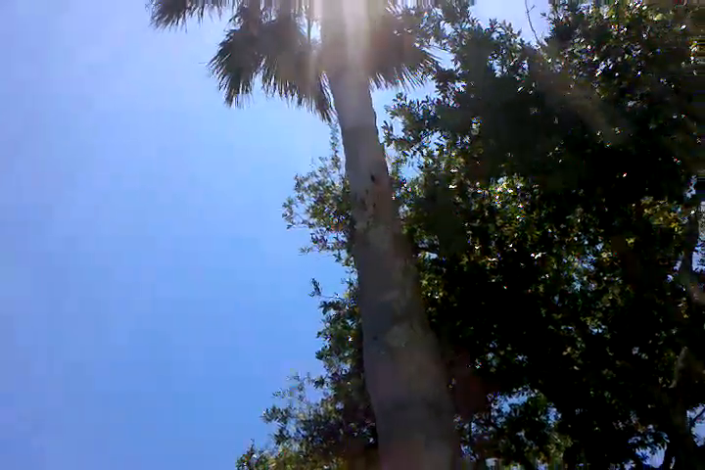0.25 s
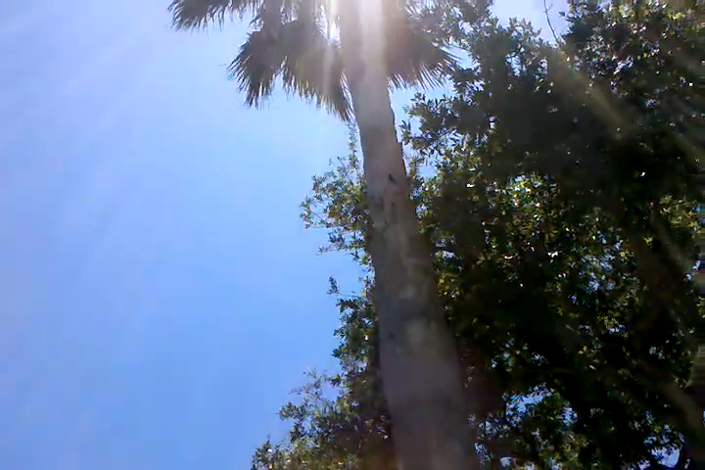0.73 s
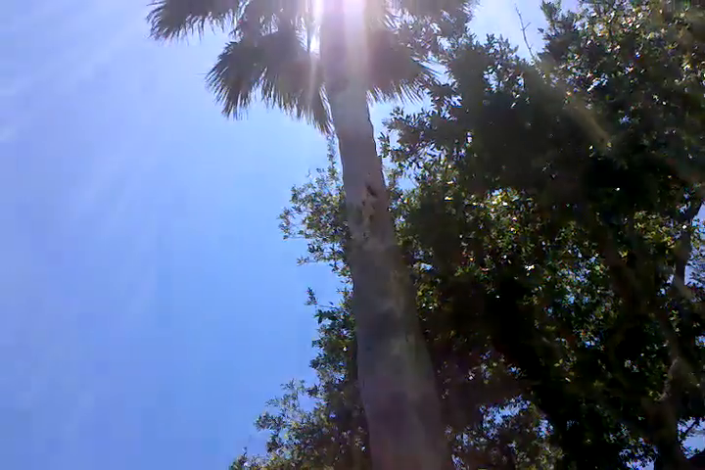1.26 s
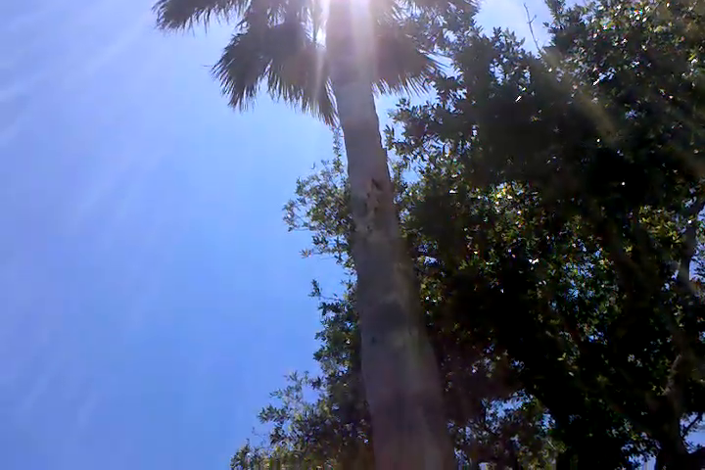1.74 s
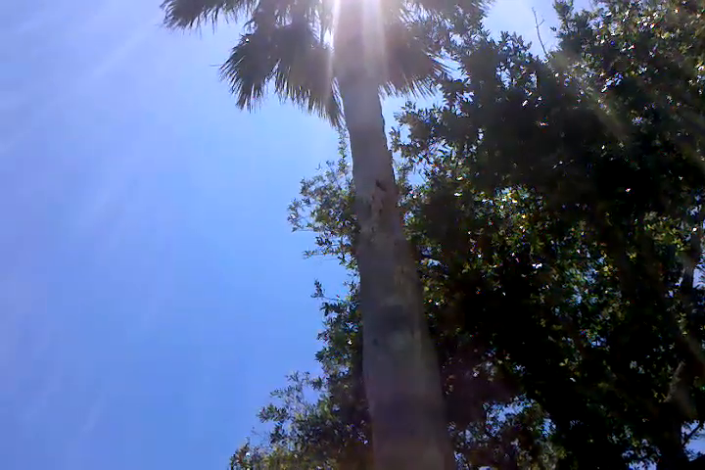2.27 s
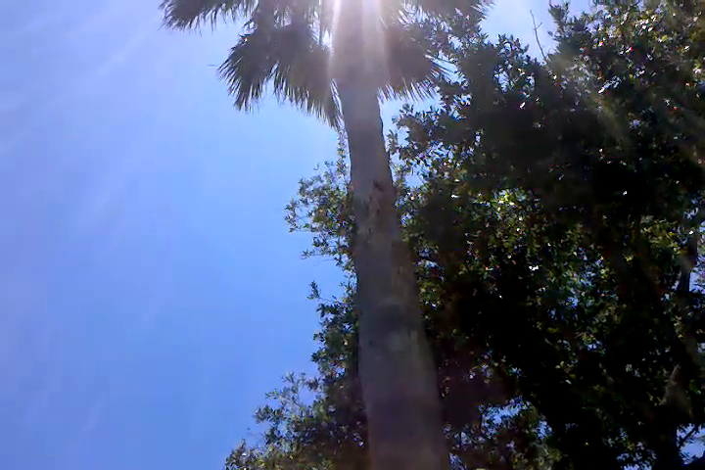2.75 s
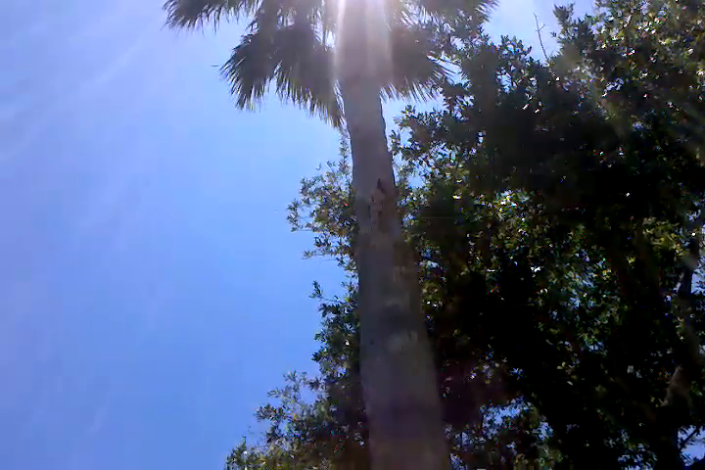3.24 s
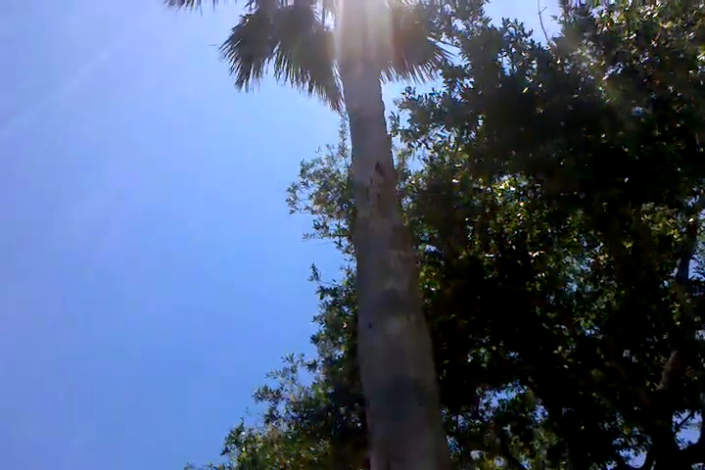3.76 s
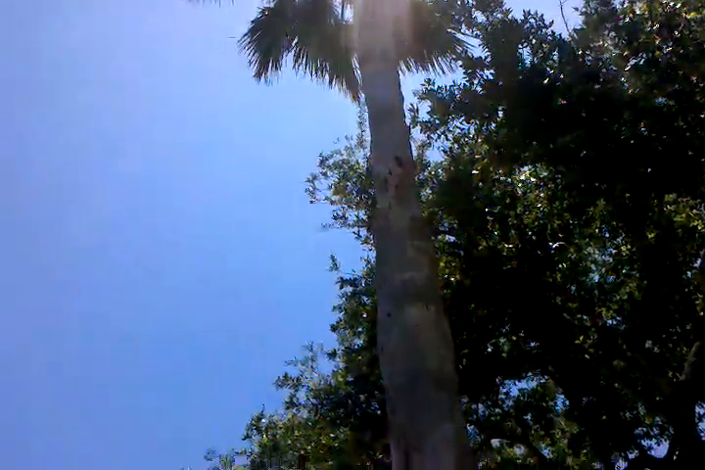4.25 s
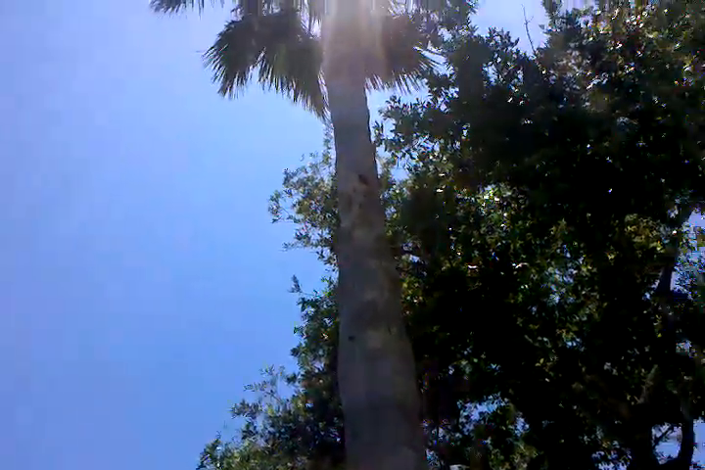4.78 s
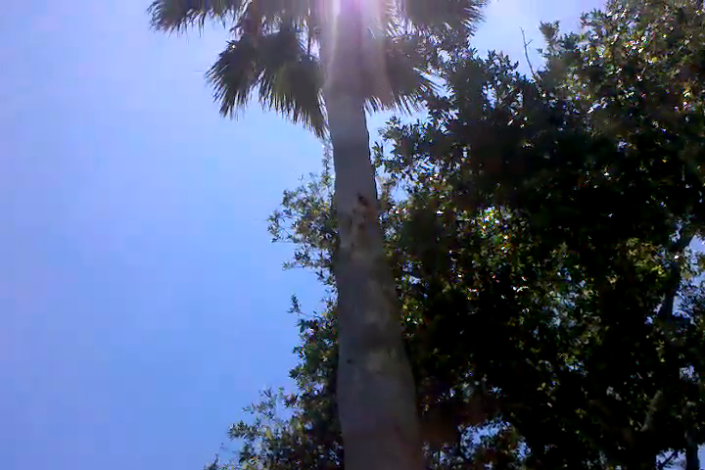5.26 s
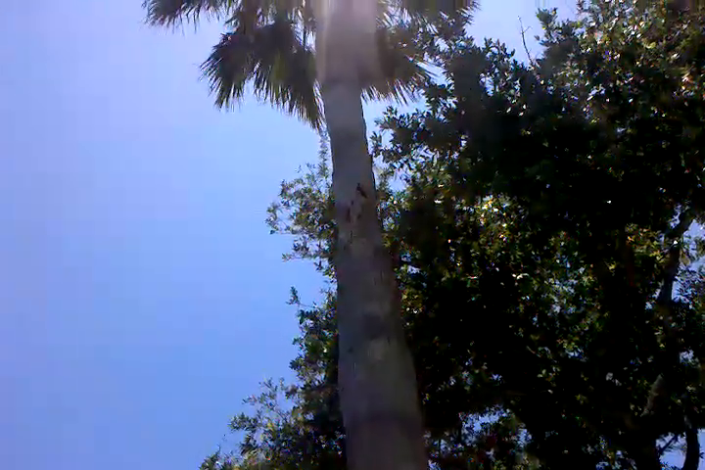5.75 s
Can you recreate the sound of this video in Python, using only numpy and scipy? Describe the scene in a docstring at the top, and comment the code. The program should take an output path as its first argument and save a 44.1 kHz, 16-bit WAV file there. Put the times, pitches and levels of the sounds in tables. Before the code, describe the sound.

A nearby woodpecker raps out a single fast burst of hollow, woody taps about two seconds in, just after a few light ticks of dry leaves. It is by far the loudest sound. Before and after, distant birds give faint chirps, thin whistles and whining notes among the trees. A low outdoor hush lies underneath, with a barely audible far engine hum and soft puffs of air on the microphone near the end.

```python
"""A clearing among trees, heard through one microphone. Close by, a woodpecker drums one roll of
twelve taps on a hollow palm trunk; the ground and the trees around throw it back. Just before, dry
fronds tick. Farther off, small birds whistle, chirp and tick, and another gives whining calls.
Under them lie a quiet outdoor hush, a faint far engine hum and soft puffs of air on the microphone."""
import sys
import numpy as np
from scipy import signal
from scipy.fft import rfft, irfft, next_fast_len
from scipy.io import wavfile
from scipy.ndimage import map_coordinates

SR = 44100
rng = np.random.default_rng(int(sys.argv[2]) if len(sys.argv) > 2 else 0)


def store_wav(level_fs):
    """Save 16-bit WAV to argv[1]."""
    pcm = np.round(np.clip(np.atleast_2d(level_fs), -1, 1) * 32767)
    wavfile.write(sys.argv[1], SR, pcm.T.astype(np.int16))


N = 264952


def amp(db):
    return 10 ** (np.asarray(db) / 20)


def along(points, hz):
    """Read a curve of (frequency, value) points on a log frequency axis."""
    point_hz, values = np.transpose(points)
    return np.interp(np.log(hz + 1), np.log(point_hz + 1), values)


def wobble(rate, size):
    """A smooth random curve, rate knots a second."""
    knots = rng.standard_normal(int(N * rate / SR) + 4)
    return map_coordinates(knots, [np.arange(size) * rate / SR])


def filtered(x, response):
    """Pass x through a response given as a function of frequency."""
    padded = next_fast_len(len(x) + SR // 4)
    return irfft(rfft(x, padded) * response(np.fft.rfftfreq(padded, 1 / SR)), padded)[:len(x)]


def noise(spectrum, size):
    """Coloured noise of rms 1."""
    x = filtered(rng.standard_normal(size), lambda hz: amp(along(spectrum, hz)))
    return x / np.sqrt(np.mean(x ** 2) + 1e-20)


def tone(hz):
    """A sine of rms 1 that follows a pitch curve."""
    return np.sqrt(2) * np.sin(2 * np.pi * np.cumsum(hz) / SR)


def envelope(t, length, attack, release):
    """Smooth rise, hold and smooth fall, between t = 0 and the length."""
    rise = np.sin(np.pi / 2 * np.clip(t / attack, 0, 1))
    fall = np.sin(np.pi / 2 * np.clip((length - t) / release, 0, 1))
    return rise * fall


def add(track, start_s, sound):
    """Mix a sound in at a time."""
    part = track[max(round(start_s * SR), 0):][:len(sound)]
    part += sound[:len(part)]


# the hush all around the clearing: (frequency [Hz], relative density [dB])
HUSH_SPECTRUM = [(15, -86), (25, -45.5), (53, -23.5), (69, -11.5), (113, -3.5), (199, -6.5), (240, -8.5),
                 (351, -11), (385, -12), (662, -14), (839, -13), (1140, -17), (2480, -23), (3700, -25),
                 (7000, -30.5), (9100, -55.5), (15400, -120)]
# puffs of air right on the microphone: (time [s], level [dB], half-length [s])
PUFFS = [(4.101, -58, 0.015), (4.509, -58, 0.037), (4.994, -58.5, 0.042), (5.518, -52.5, 0.0058),
         (5.684, -55.5, 0.024), (5.858, -56, 0.013), (5.911, -58.5, 0.0214)]
# their low thud: (frequency [Hz], relative density [dB])
PUFF_SPECTRUM = [(30, -33), (80, -12), (125, -2), (190, -3), (280, -26), (600, -41.5)]

def air(hush_db=-63, hiss_db=-77, rumble_waver_db=1.9):
    """Outdoor hush with an unsteady low rumble, thin hiss, and puffs on the microphone."""
    t = np.arange(N) / SR
    hush = amp(hush_db) * noise(HUSH_SPECTRUM, N)
    rumble = filtered(hush, lambda hz: 1 / (1 + (hz / 250) ** 2))
    hush += rumble * (amp(rumble_waver_db * wobble(8.2, N)) - 1)
    hiss = amp(hiss_db) * noise([(3000, -32), (5800, -3), (6800, -1), (7600, -16), (9000, -17)], N)
    puffs = sum(amp(db) * np.exp(-((t - s) / width) ** 2) for s, db, width in PUFFS)
    return hush + hiss + puffs * noise(PUFF_SPECTRUM, N)


# the engine's lowest orders: (multiple of the firing rate, steady level [dB], swelling part [dB])
ENGINE_ORDERS = [(1, -78, -88), (2, -77, -68.5), (3, -85, -76.5)]
# its two swells: (time [s], length [s], gain on the swelling part [dB])
ENGINE_SWELLS = [(3.35, 0.78, -1), (4.382, 0.6, -3.5)]

def engine(firing_hz=111.4, drift=0.0051, waver_db=1.5):
    """Far away an engine hums on unsteadily; its second order stands out when it swells."""
    t = np.arange(N) / SR
    swell = sum(amp(db) * envelope(t - s, length, attack=0.22, release=0.23)
                for s, length, db in ENGINE_SWELLS)
    hz = firing_hz * (1 + drift * wobble(8, N))
    out = np.zeros(N)
    for order, steady_db, swell_db in ENGINE_ORDERS:
        level = amp(steady_db + waver_db * wobble(4.6, N)) + amp(swell_db) * swell
        out += level * tone(order * hz)
    return out


# thin whistles deep in the trees: (time [s], length [s], first pitch [Hz], last pitch [Hz], level [dB])
WHISTLES = [(0, 0.097, 3240, 3080, -72.5), (.44, 0.68, 2490, 2465, -82), (1.202, .12, 4030, 4320, -73),
            (4.905, 0.09, 3710, 3690, -73), (5.021, 0.21, 3700, 3750, -79), (5.21, .15, 5000, 4240, -67),
            (5.33, 0.072, 4374, 4430, -69), (5.475, .09, 4860, 4360, -66.5),
            (5.556, 0.16, 4560, 4250, -71.5), (5.717, .2, 4750, 4233, -69)]

def whistles(waver=0.012, flutter_db=3, slide_share=0.3):
    """Distant birds whistle pure, slightly unsteady notes that slide quickly and then settle."""
    out = np.zeros(N)
    for s, length, first_hz, last_hz, db in WHISTLES:
        t = np.arange(0, length, 1 / SR)
        hz = last_hz + (first_hz - last_hz) * np.exp(-t / (slide_share * length))
        flutter = amp(flutter_db * wobble(38.7, len(t)))
        voice = flutter * tone(hz * (1 + waver * wobble(172, len(t))))
        add(out, s, amp(db) * envelope(t, length, attack=0.028, release=0.04) * voice)
    return out


# chirps deep in the trees: (time [s], level [dB], pitch ratio, height of the upper arch [0-1])
CHIRPS = [(.147, -63, 0.88, 0.7), (1.264, -64, 0.92, 1), (3.168, -60.5, 0.99, .85),
          (4.456, -60.5, 0.98, 0.98), (5.8, -61, 0.96, 0.88)]
# a chirp's two arches: (foot [Hz], rise [Hz], crest time [s], half-width [s], relative level [dB])
CHIRP_VOICES = [(2410, 780, .05, .031, -1), (3060, 1000, .054, 0.023, -2.5)]
# its opening rasp: (frequency [Hz], relative density [dB])
RASP_SPECTRUM = [(1500, -22), (2200, -16), (3200, -1), (4100, 4.5), (4800, -1), (5800, -5.5), (6600, -3),
                 (7500, -37.5)]

def chirps(length_s=0.1, waver=0.012, flutter_db=3.5, rasp_db=4.5, rasp_fade_db_per_s=188):
    """Both sides of the syrinx sound at once: a harsh start opens into two arched, fluttering tones."""
    out, t = np.zeros(N), np.arange(0, length_s, 1 / SR)
    voice_shape = envelope(t, length_s, attack=0.056, release=0.031) ** 2
    rasp_shape = envelope(t, length_s, attack=0.018, release=0.031)
    rasp_shape *= amp(rasp_db - rasp_fade_db_per_s * t)
    for s, db, ratio, upper_arch in CHIRPS:
        sound = rasp_shape * noise(RASP_SPECTRUM, len(t))
        for (foot_hz, rise_hz, crest_s, width_s, voice_db), arch in zip(CHIRP_VOICES, (1, upper_arch)):
            hz = ratio * (foot_hz + arch * rise_hz * np.exp(-((t - crest_s) / width_s) ** 2))
            level = amp(voice_db + flutter_db * wobble(106.6, len(t)))
            sound += voice_shape * level * tone(hz * (1 + waver * wobble(400, len(t))))
        add(out, s, amp(db) * sound)
    return out


# whining calls from the trees: (time [s], length [s], top pitch [Hz], place of the crest [0-1],
# droop at the far end [share], level [dB], brightness [dB per overtone], pitch jitter [share])
WHINES = [(1.1, 0.079, 990, 0.27, 0.16, -65, -0.5, .009),
          (1.155, 0.1, 819, 0.57, 0.016, -69.5, -3.5, 0.0054),
          (1.276, .125, 870, 0.5, 0.056, -69.5, 0, 0.0055), (3.137, .08, 988, 0.03, 0.24, -64, -0.2, .012),
          (3.28, 0.17, 863.5, 0.48, .05, -69.5, -.4, .012), (3.439, .14, 857, 0.36, .07, -72.5, -1.8, .012),
          (5.226, 0.068, 968, 0.06, 0.2, -65.5, 1, .014), (5.329, 0.081, 730, 0.92, 0.079, -72.5, -2, .007),
          (5.378, 0.17, 854, 0.41, 0.12, -64.5, -0.4, 0.0031)]
# the bird's throat, which colours the overtones: (frequency [Hz], gain [dB])
THROAT = [(1300, 5), (1650, 2), (1950, -4), (2500, -6.5), (2950, -7), (3400, -12.5), (3950, -8.5),
          (4350, -4.5), (4950, -5.5), (5250, -11), (6000, -18)]

def whines(flutter_db=2):
    """A bird's nasal notes, harmonics 2 to 6: the pitch arches over a crest and droops on both sides."""
    out = np.zeros(N)
    for s, length, top_hz, crest, droop, db, bright_db, jitter in WHINES:
        t = np.arange(0, length, 1 / SR)
        from_crest = (t / length - crest) / max(crest, 1 - crest)
        hz = top_hz * (1 - droop * from_crest ** 2) * (1 + jitter * wobble(299, len(t)))
        voice = np.zeros(len(t))
        for k in range(2, 7):
            overtone_db = along(THROAT, k * hz) + bright_db * (k - 2.5)
            voice += amp(overtone_db + flutter_db * wobble(38, len(t))) * tone(k * hz)
        add(out, s, amp(db) * envelope(t, length, attack=0.019, release=0.035) * voice)
    return out


# dry fronds touching: (time [s], level [dB])
FROND_TICKS = [(1.9293, -52), (1.941, -48.5), (1.984, -46), (2.0305, -47.5), (2.0507, -49)]

def fronds(gain_db=-9, attack_s=0.00092, tick_t60=0.019, rustle_db=-15, rustle_t60=0.4):
    """Dry leaves tick against each other and rustle briefly."""
    out, t = np.zeros(N), np.arange(SR // 5) / SR
    decay = amp(-60 * t / tick_t60) + amp(rustle_db - 60 * t / rustle_t60)
    shape = decay * (1 - np.exp(-t / attack_s))
    for s, db in FROND_TICKS:
        rustle = noise([(1200, -11), (3400, -3.5), (6800, -9.5), (8000, -22)], len(t))
        add(out, s, amp(db + gain_db) * shape * rustle)
    return out


# beak blows near the microphone, building up and slowing slightly: (time [s], strength [dB])
TAPS = [(2.267, -8.5), (2.3278, -3.5), (2.3907, -3), (2.4548, -1.5), (2.5201, -.5), (2.5858, -.5),
        (2.651, -0.39), (2.7178, .3), (2.7855, 0), (2.8532, -0.23), (2.921, -0.3), (2.991, -1.8)]
# the hollow trunk's modes: (frequency [Hz], level [dB], t60 [s])
TRUNK_MODES = [(406, -43.5, 0.033), (490.3, -33, 0.096), (546.6, -39, 0.071), (610, -43, 0.068),
               (640, -51, 0.062), (705.3, -22, 0.05), (715, -13.5, 0.025), (835, -17, 0.024),
               (950, -31.5, 0.018), (1028, -28, 0.0075), (1192, -41.5, 0.076), (1240, -50.5, 0.056),
               (1377, -27, 0.023), (1595, -38, 0.024), (1735, -36.5, 0.017), (1992, -33.5, 0.015),
               (2230, -39.5, 0.023), (2563, -50, 0.076), (2662, -52.5, 0.082), (2826, -55, 0.064)]
# the beak's contact: (frequency [Hz], relative density [dB])
CLICK_SPECTRUM = [(1200, -29.5), (2400, -1), (3400, -3), (4200, 0.5), (4600, -1), (5200, -3), (6000, -6.5),
                  (6750, 3.5), (7300, -14), (8500, -15)]

def drumming(dulling=2.24, dull_hz=1750, radiate_hz=190, click_db=-39.8, click_growth=1.83,
             bite_s=0.0024, click_t60=0.0075, rattle_db=-16, rattle_t60=0.098):
    """Each blow rings the trunk's modes, and the beak clicks as it bites, more so on harder blows."""
    out, t = np.zeros(N), np.arange(SR // 6) / SR
    hz, mode_db, t60 = np.transpose(TRUNK_MODES)
    signs = (-1) ** np.arange(len(hz))[:, None]  # neighbouring modes swing in opposite senses
    modes = signs * np.sin(2 * np.pi * hz[:, None] * t) * amp(-60 * t / t60[:, None])
    bite = np.minimum(t / bite_s, 1) ** 2
    after = np.maximum(t - bite_s, 0)
    click_shape = bite * (amp(-60 * after / click_t60) + amp(rattle_db - 60 * after / rattle_t60))
    spot = noise(CLICK_SPECTRUM, len(t))
    for s, blow_db in TAPS:
        # a softer blow stays longer in contact and loses the high modes first
        softness_db = dulling * blow_db / (1 + (dull_hz / hz) ** 10)
        ring = amp(blow_db + mode_db + softness_db + rng.normal(0, 0.18, len(hz))) @ modes
        # the beak lands on the same spot, so the click keeps most of its colour
        click = (spot + 0.55 * noise(CLICK_SPECTRUM, len(t))) * click_shape
        click *= np.linalg.norm(click_shape) / np.linalg.norm(click)
        add(out, s, ring + amp(click_db + click_growth * blow_db) * click)
    # a narrow trunk hardly radiates bass
    return filtered(out, lambda f: f ** 4 / (f ** 4 + radiate_hz ** 4))


# a small bird ticking some way off: (time [s], level [dB], length without the tail [s])
BIRD_TICKS = [(4.33, -64.5, 0.01), (4.655, -59.5, 0.013), (4.837, -55.5, 0.0092), (4.995, -63.5, 0.012),
              (5.67, -70, 0.045), (5.858, -66.5, 0.048)]

def bird_ticks(first_hz=7250, last_hz=4250, sweep_share=0.75, fade_db=7, tail_db=-14):
    """A small bird's contact note: one fast downward sweep that flattens into a faint tail."""
    out = np.zeros(N)
    for s, db, length in BIRD_TICKS:
        progress = np.arange(0, 2 * length, 1 / SR) / length
        hz = last_hz + (first_hz - last_hz) * np.exp(-(progress / sweep_share) ** 2)
        note = envelope(progress, 0.9, attack=0.25, release=0.3)
        tail = amp(tail_db) * envelope(progress, 2, attack=0.25, release=0.3)
        add(out, s, amp(db - fade_db * progress) * (note + tail) * tone(hz))
    return out


def reflected(x, paths, dull_hz):
    """Delayed copies from surfaces that swallow the treble."""
    def response(hz):
        copies = sum(amp(db) * np.exp(-2j * np.pi * hz * delay) for delay, db in paths)
        return copies / (1 + (hz / dull_hz) ** 2)
    return filtered(x, response)


# scattering among the trees around the microphone: (frequency [Hz], t60 [s])
GROVE_DECAY = [(300, .2), (500, .25), (820, 0.68), (1300, 0.41), (3000, 0.72), (7000, 0.37)]

def grove(x, build_s):
    """Diffuse echo of the trees: it builds up, then each frequency dies at its own speed."""
    hz, t, scatter = signal.stft(rng.standard_normal(SR // 2), SR, nperseg=256)
    decay = amp(-60 * t / along(GROVE_DECAY, hz)[:, None])
    build = 1 - np.exp(-t / build_s)
    _, tail = signal.istft(scatter * decay * build, SR, nperseg=256)
    return signal.fftconvolve(x, tail / np.linalg.norm(tail))[:N]


# the ground by the trunk, then farther surfaces: (delay [s], level [dB])
NEAR_ECHOES = [(0.00857, -9.5), (0.01064, -14), (0.03181, -43.5), (0.03522, -33.5), (0.04595, -30)]
# the edge of the clearing, answering late: (delay [s], level [dB])
EDGE_ECHOES = [(.055, -40), (0.107, -25)]

def scene():
    """The drumming is near and fairly dry; the whistles and chirps sit deepest among the trees."""
    drum = drumming()
    drum += reflected(drum, NEAR_ECHOES, dull_hz=6500)
    drum += reflected(drum, EDGE_ECHOES, dull_hz=2500) + amp(-20) * grove(drum, build_s=0.014)
    birds = chirps() + whistles()
    bird_echoes = amp(11) * reflected(birds, EDGE_ECHOES, dull_hz=6000)
    birds = amp(-2.5) * birds + bird_echoes + amp(-8.5) * grove(birds, build_s=0.0095)
    whine = whines()
    whine = amp(-0.15) * whine + amp(-7) * grove(whine, build_s=0.006)
    return np.array([drum + birds + whine + bird_ticks() + fronds() + air() + engine()])


def record(dry, top_hz=7300, skirt_db=-19, stop_hz=8800):
    """The microphone's narrow band ends steeply, with a faint skirt and nothing above it."""
    def band(hz):
        rolloff = 1 / np.sqrt(1 + (hz / top_hz) ** 80)
        return np.maximum(rolloff, amp(skirt_db)) * (hz < stop_hz)
    return np.array([filtered(dry[0], band)])


dry = scene()
out = record(dry)
store_wav(out)
```